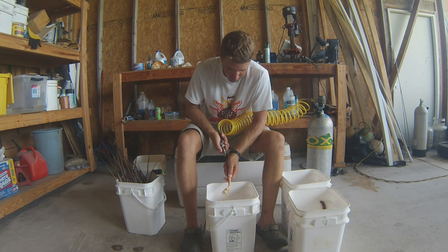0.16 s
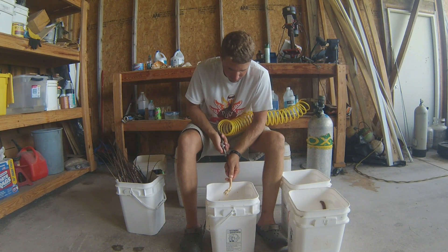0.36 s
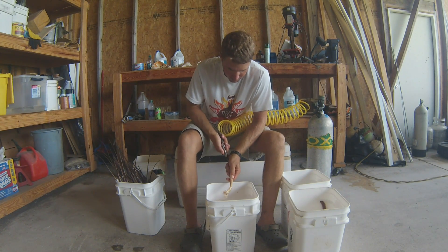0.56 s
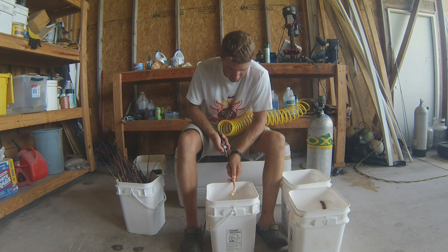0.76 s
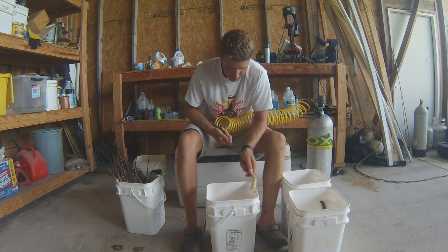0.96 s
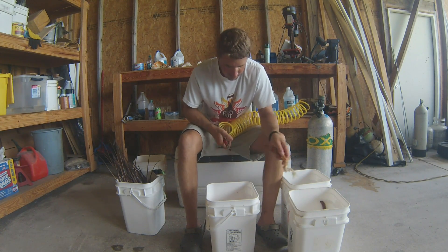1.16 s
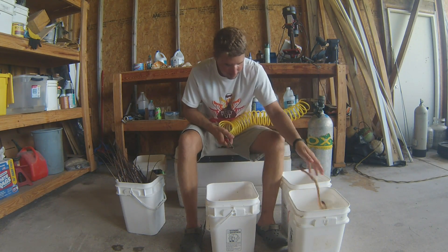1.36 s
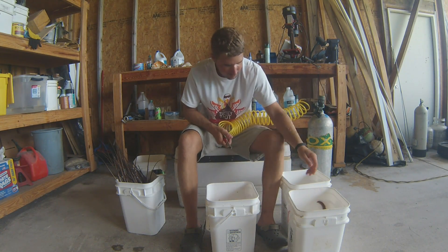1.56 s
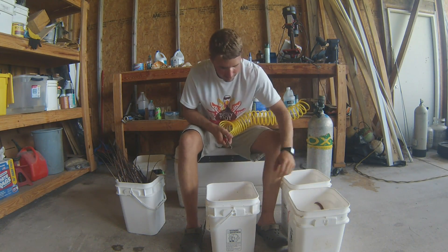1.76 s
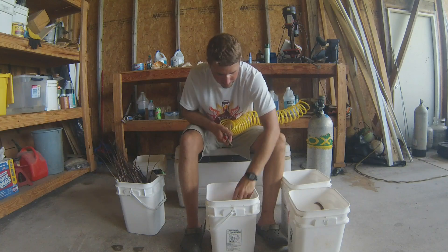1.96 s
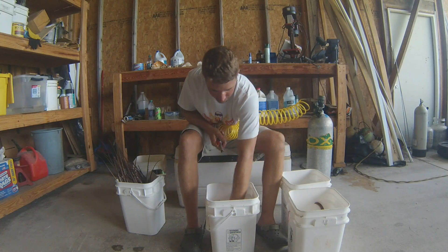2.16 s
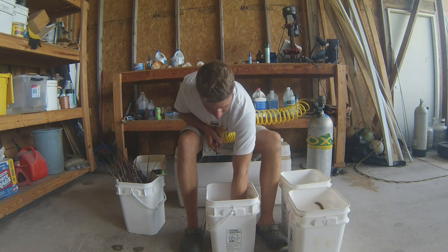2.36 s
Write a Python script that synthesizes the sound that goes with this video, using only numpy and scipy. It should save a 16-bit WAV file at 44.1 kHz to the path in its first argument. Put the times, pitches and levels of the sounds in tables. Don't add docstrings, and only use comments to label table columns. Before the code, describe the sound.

A brief hard burst of compressed air with a wet pop, then an empty shell clatters into a plastic bucket, hollow bumps follow, and a hand rummages among shells; echoing garage, small camera across the room.

```python
import sys
import numpy as np
from scipy import signal
from scipy.fft import rfft, irfft, next_fast_len
from scipy.io import wavfile
from scipy.ndimage import map_coordinates

SR = 44100
rng = np.random.default_rng(int(sys.argv[2]) if len(sys.argv) > 2 else 0)


def gain_from_db(level_db):
    decades = np.asarray(level_db, float) / 20
    return 10 ** decades


def put_to_file(sound):
    columns = np.atleast_2d(sound).T
    safe = np.clip(columns, -1, 1)
    whole_steps = np.round(safe * 32767)
    wavfile.write(sys.argv[1], SR, whole_steps.astype(np.int16))


N = 110250
T = np.arange(N) / SR


def unit(x):
    return x / np.sqrt(np.mean(x ** 2) + 1e-20)


def along(points, hz):
    point_hz, value = np.transpose(points)
    return np.interp(np.log(hz + 1), np.log(point_hz + 1), value)


def filtered(x, response):
    m = next_fast_len(len(x) + 8192)
    return irfft(rfft(x, m) * response(np.fft.rfftfreq(m, 1 / SR)), m)[:len(x)]


def noise(spectrum, size=N):
    return unit(filtered(rng.standard_normal(size), lambda hz: gain_from_db(along(spectrum, hz))))


def wobble(rate):
    return map_coordinates(rng.standard_normal(int(N * 500 / SR) + 4), [T * min(rate, 500)])


def ramp(start_s, length_s):
    return np.clip((T - start_s) / length_s, 0, 1)


def add(track, start_s, sound):
    part = track[round(start_s * SR):][:len(sound)]
    part += sound[:len(part)]


# pitch_hz, level_db (per Hz)
RUMBLE = [(12, -49.5), (20, -25.5), (60, 0.5), (73, -2), (87, -9.5), (162, -7), (193, -20.5), (225, -9.5),
          (420, -25), (550, -60), (920, -120)]
# pitch_hz, level_db (per Hz)
AIR = [(210, -18.5), (350, -11.5), (431, -6.5), (729, -11.5), (1160, -13), (1380, -17), (2260, -22.5),
       (8760, -26), (15800, -35.5)]


def background():
    whine = gain_from_db(-77 + 1.5 * wobble(90)) * np.sin(2 * np.pi * 13040 * T + 1.2 * wobble(120))
    hum = gain_from_db(-49 + 1.0 * wobble(14)) * np.sin(2 * np.pi * 56.5 * T + .8 * wobble(13))
    rumble = gain_from_db(-48 + 0.4 * wobble(5.14)) * noise(RUMBLE)
    air = gain_from_db(-58 + 0.85 * wobble(1.9)) * noise(AIR)
    return hum + rumble + air + whine


LEAK_S, LEAK_RISE_S, LEAK_DB, LEAK_SWELL_DB = 0.14, 0.027, -42.5, 8.5
POP_S, OPEN_S, SHUT_S, CLOSE_S = .2098, 0.0076, 0.39, 0.0069
JET_DB, SAG_DB, SAG_S = -26.5, 4, .08
SURGE_DB, SURGE_S, SURGE_RISE_S = -19, .009, .0065
GULP_DB, GULP_S, WHISTLE_DB = -22.5, 0.046, 3.5
# pitch_hz, level_db (per Hz)
LEAK = [(710, -24), (1200, -15), (1960, -21), (2090, -27), (5370, -10), (6110, -9.5), (12000, -14),
        (15500, -24)]
# pitch_hz, level_db (per Hz)
JET = [(180, -57), (300, -14), (985, -5.5), (1140, 4.5), (1730, -20), (2360, -16), (5130, 2), (5850, -2),
       (12000, -9), (15500, -20.5)]
# pitch_hz, width_hz, level_db
WHISTLE = [(1163, 134, -5.5), (2517, 1100, -5.5), (4070, 830, -2), (5590, 240, 2.5), (7470, 1300, -4)]
# pitch_hz, level_db
SURGE = [(300, -12), (700, -8), (1500, -14), (3000, 3.5), (4000, -8), (6000, 1.5), (8000, -12),
         (12000, -23)]
# pitch_hz, level_db (per Hz)
GULP = [(35, -24.5), (80, 0), (170, 7.5), (300, 2.5), (400, -21), (560, -14), (1150, 1.5), (1600, -6),
        (2500, -40)]
# start_s, level_db, pitch_hz
SNAPS = [
    (.2167, -1, 3700),
    (.2222, -9, 3900),
    (.2328, -14, 3700),
]


def tube(f):
    return sum((-1) ** k * gain_from_db(db) * 1j * f * width / (centre ** 2 - f * f + 1j * f * width)
               for k, (centre, width, db) in enumerate(WHISTLE))


def nozzle():
    def fall(decay_s):
        return np.exp(-np.maximum(T - POP_S - SURGE_RISE_S, 0) / decay_s)

    leak_db = LEAK_DB + LEAK_SWELL_DB * ramp(LEAK_S, POP_S - LEAK_S)
    leak = gain_from_db(leak_db) * ramp(LEAK_S, LEAK_RISE_S) * noise(LEAK)
    air = noise(JET) + gain_from_db(WHISTLE_DB) * unit(filtered(rng.standard_normal(N), tube))
    flow_db = JET_DB + SAG_DB * fall(SAG_S) + 1.4 * wobble(202.2) + 0.2 * wobble(37)
    flow = gain_from_db(flow_db) * ramp(POP_S, OPEN_S) * unit(air)
    surge_level = gain_from_db(SURGE_DB + 1.2 * wobble(401.5)) * ramp(POP_S, SURGE_RISE_S) * fall(SURGE_S)
    surge = surge_level * noise(SURGE)
    gulp = gain_from_db(GULP_DB) * ramp(POP_S, OPEN_S) * fall(GULP_S) * noise(GULP)
    out = (1 - ramp(SHUT_S, CLOSE_S)) * (leak + flow + surge + gulp)
    t = T[:SR // 50]
    for start_s, db, hz in SNAPS:
        add(out, start_s, -gain_from_db(db - 60 * t / .0035) * np.sin(2 * np.pi * hz * t))
    return out


CRACK_T60, WALL_NOISE_T60, WALL_NOISE_DB = .028, 0.064, 6.5
DROP_T60, BUMP_T60 = 0.22, .09
DROP_TWIN, BUMP_TWIN, TWIN_DB = 1.14, .89, -13
SLAP_DB, SLAP_S = -5, .00025
# start_s, crack_db, wall_db, drum_db, drum_hz
DROPS = [(.212, -50, -20, -18.5, 255.7), (1.145, -42, -34, -59, 270), (1.1685, -44, -32, -23, 275.4),
         (1.187, -18.5, -19, -19.5, 239.2), (1.194, -53, -24.5, -34, 251), (1.203, -49, -27, -33, 229),
         (1.226, -36, -36, -25.5, 235.7), (1.253, -44, -29.5, -30, 234.5), (1.321, -30.5, -27, -35, 244),
         (1.333, -49, -36, -41.5, 224), (1.596, -48, -50, -45, 391), (1.608, -50.5, -50, -39, 297)]
# start_s, crack_db, wall_db, drum_db, drum_hz
BUMPS = [(1.4224, -70, -27.5, -14, 274.3), (1.4305, -48, -39.5, -37, 264), (1.451, -58, -60, -32, 262),
         (1.627, -54, -55, -31.5, 270.5), (1.647, -61, -70, -36, 219), (1.68, -65, -55, -36.5, 260),
         (1.871, -54, -49, -25, 288), (1.89, -58, -40.5, -30, 295), (1.928, -51, -64, -35, 278),
         (1.947, -56.5, -40.5, -40, 285.5), (2.146, -35, -44.5, -39.5, 329), (2.17, -41, -40.5, -36, 295),
         (2.322, -67, -40, -29.5, 273), (2.337, -67, -49.5, -25.5, 274.6), (2.351, -52, -52, -29, 256),
         (2.361, -36.5, -34, -25, 267.6), (2.424, -32, -37.5, -34.5, 295), (2.464, -33, -40, -35.5, 300),
         (2.484, -29.5, -36.5, -39, 272)]
# pitch_hz, level_db, t60_s
WALL = [(355, -1, 0.05), (406, -4, 0.032), (542, -3.5, 0.063), (685, -8, 0.048), (729, -0.5, 0.036),
        (848, 0, 0.037), (913, -21.5, 0.24), (1010, -16, 0.2), (1152, 3, 0.054), (1334, -5.5, 0.045)]
# pitch_hz, level_db
SHELL = [(1300, -8), (2500, 9.5), (4100, 0.5), (6000, 1.5), (8000, 5.5), (11000, -15), (15500, -19)]
# pitch_hz, level_db
PILE = [(1300, -1), (2600, 0), (4200, 1), (5500, -5), (8000, -23), (12000, -28), (15500, -33)]


def bucket_wall(t):
    modes = 0
    for hz, db, t60 in WALL:
        level = gain_from_db(db + rng.normal(0, 4) - 60 * t / t60)
        modes = modes + level * np.sin(2 * np.pi * hz * rng.normal(1, .02) * t + rng.uniform(0, 6))
    spectrum = [(250, -5.5), (450, 3.5), (750, 5.5), (1300, 0.5), (1900, -29.5), (3000, -47)]
    diffuse = gain_from_db(WALL_NOISE_DB - 60 * t / WALL_NOISE_T60) * noise(spectrum, size=len(t))
    return 0.6 * modes + 0.5 * diffuse


def knocks(rows, colour, drum_t60, twin):
    out, t = np.zeros(N), T[:SR // 4]
    soft, sharp = 1 - np.exp(-t / .002), 1 - np.exp(-t / .001)
    for start_s, crack_db, wall_db, drum_db, hz in rows:
        crack = gain_from_db(crack_db - 60 * t / CRACK_T60) * np.minimum(t * 1000, 1) * noise(colour, size=len(t))
        wall = sharp * gain_from_db(wall_db) * bucket_wall(t)
        modes = np.sin(2 * np.pi * hz * t) + gain_from_db(TWIN_DB) * np.sin(2 * np.pi * hz * twin * t)
        drum = soft * gain_from_db(drum_db - 60 * t / drum_t60) * modes
        slap = gain_from_db(drum_db + SLAP_DB) * np.exp(-.5 * ((t - .6 / hz) / SLAP_S) ** 2)
        add(out, start_s, crack + wall - drum + slap)
    return out


# start_s, level_db, pitch_hz,
# t60_s
TICKS = [(.2335, -27, 3650, 0.022), (0.2424, -24, 4050, .015), (.26, -19, 2820, 0.025),
         (.609, -50, 5100, 0.022), (1.1453, -40, 9500, .006), (1.148, -39, 2400, 0.035),
         (1.1875, -24, 7780, 0.015), (1.203, -19, 7050, 0.013), (1.226, -48, 9300, 0.0093),
         (1.252, -46, 7740, 0.012), (1.298, -36, 7200, 0.0088), (1.32, -37.5, 9080, 0.011),
         (1.332, -45, 13000, .012), (1.338, -37, 6800, 0.013), (1.384, -45, 7000, 0.014),
         (1.596, -48, 1460, 0.034), (1.95, -50.5, 2550, 0.02), (2.08, -44.5, 850, .04),
         (2.128, -53, 3000, .01), (2.141, -42, 2570, .015), (2.148, -30.5, 4160, 0.012),
         (2.167, -42.5, 2850, 0.035), (2.17, -59, 11500, 0.024), (2.18, -32, 1358, .04),
         (2.218, -56, 11000, 0.0093), (2.222, -40.5, 3460, 0.023), (2.2684, -41, 2610, 0.046),
         (2.272, -56, 12000, .02), (2.282, -41, 4030, 0.016), (2.297, -43, 6340, 0.011),
         (2.313, -46, 2400, 0.019), (2.342, -42, 2400, .04), (2.406, -42, 2440, .02),
         (2.424, -35.5, 3040, .03), (2.454, -53, 11500, .03), (2.4655, -26, 1400, 0.022),
         (2.485, -49.5, 11500, 0.043), (2.485, -39, 8100, 0.022), (2.4985, -39, 3500, .02)]


def ticks():
    out, t = np.zeros(N), T[:SR // 16]
    for start_s, db, hz, t60 in TICKS:
        draw = rng.uniform(-1, 1, (24, 2))
        mode_hz = hz * (1 + .17 * draw[:, :1])
        ring = np.sin(2 * np.pi * mode_hz * t + 2.5 * draw[:, 1:]).sum(axis=0) / 4
        add(out, start_s, gain_from_db(db - 60 * t / t60) * np.minimum(t * 900, 1) * ring)
    return out


GRAINS_PER_S, GRAIN_DB, WASH_DB = 2800, 4, -1
GRAIN_HZ, GRAIN_SPREAD, GRAIN_CYCLES = 2300, 2.9, 3
# start_s, level_db
RATTLE = [
    (1.144, -44),
    (1.15, -42),
    (1.19, -38),
    (1.29, -40.5),
    (1.31, -49),
    (1.34, -48),
    (1.42, -62),
]
# pitch_hz, level_db (per Hz)
SPRAY = [(240, -36), (450, -28), (700, 6), (1300, 10.5), (2200, -5.5), (4000, -4), (7000, -37),
         (12000, -42), (15600, -50)]
# start_s, level_db
RUMMAGE = [
    (2.122, -53),
    (2.14, -38.5),
    (2.19, -42.5),
    (2.25, -43.5),
    (2.3, -42),
    (2.4, -43),
    (2.45, -43),
    (2.5, -52),
]
# pitch_hz, level_db (per Hz)
SCRAPE = [(240, -31), (450, -2.5), (590, -18), (730, 0.5), (1400, -3), (1800, -9), (2600, -13.5),
          (4010, -17), (8000, -21.5), (12000, -41), (15600, -60)]


def scrape(rows, spectrum):
    s, db = np.transpose(rows)
    draw, t = rng.random((1500, 3)), np.arange(256)
    gaps_s = -np.log(draw[:, 0]) / GRAINS_PER_S
    start = (SR * (s[0] + np.cumsum(gaps_s))).astype(int)[:, None]
    hz = np.clip(GRAIN_HZ * np.exp(GRAIN_SPREAD * (draw[:, 1:2] - .5)), 300, 14000)
    level = gain_from_db(-GRAIN_DB * np.log(draw[:, 2:] + 0.099)) * np.sqrt(hz)
    decay = np.exp(-t / SR * hz / GRAIN_CYCLES * 2)
    rings = level * decay * np.sin(2 * np.pi * hz * t / SR)
    hits = np.bincount((start + t).ravel(), rings.ravel(), minlength=N)[:N]
    active = (T > s[0]) & (T < s[-1])
    wash = gain_from_db(WASH_DB + 5.0 * wobble(50)) * rng.standard_normal(N)
    grains = hits / np.std(hits[active]) + wash
    grains = filtered(grains, lambda f: gain_from_db(along(spectrum, f)))
    return gain_from_db(np.interp(T, s, db)) * active * grains / np.std(grains[active])


ROOM_DB, ROOM_DELAY_S = -3.5, .006
# pitch_hz, t60_s
GARAGE = [(150, 0.48), (1000, 0.59), (4000, 0.43), (8000, 0.41), (14000, 0.38)]
# start_s, level_db
WALLS = [(.0055, -12), (0.0176, -19.5), (0.028, -16), (0.042, -17)]
# pitch_hz, level_db
ROOM_TONE = [(150, -8.5), (280, -7.5), (400, -1.5), (600, -1.5), (1000, -4.5), (3000, -2.5), (10000, -0.5)]


def garage(x):
    hz, t, z = signal.stft(rng.standard_normal(SR), SR, nperseg=256)
    tail = signal.istft(z * gain_from_db(-60 * t / along(GARAGE, hz)[:, None]), SR, nperseg=256)[1]
    reply = np.zeros(SR)
    for start_s, db in WALLS:
        reply[round(start_s * SR)] = gain_from_db(db)
    add(reply, ROOM_DELAY_S, gain_from_db(ROOM_DB) * tail / np.linalg.norm(tail))
    return x + filtered(signal.fftconvolve(x, reply)[:N], lambda f: gain_from_db(along(ROOM_TONE, f)))


# pitch_hz, width_hz, level_db
HOUSING = [(1140, 940, 2), (1670, 1570, -5), (2560, 600, 5.5), (4180, 730, 5), (5390, 360, -5.5),
           (5900, 600, 2), (6800, 700, -3), (9200, 610, -5)]


def housing(x):
    def response(f):
        shape_db = sum(db * np.exp(-.5 * ((f - c) / w * 2) ** 2) for c, w, db in HOUSING)
        cepstrum = irfft(np.log(gain_from_db(shape_db)))
        cepstrum[1:len(cepstrum) // 2] *= 2
        cepstrum[len(cepstrum) // 2 + 1:] = 0
        return np.exp(rfft(cepstrum))[:len(f)]
    return filtered(x, response)


def scene():
    drops = knocks(DROPS, SHELL, DROP_T60, DROP_TWIN)
    bumps = knocks(BUMPS, PILE, BUMP_T60, BUMP_TWIN)
    slides = scrape(RATTLE, SPRAY) + scrape(RUMMAGE, SCRAPE)
    near = nozzle() + drops + bumps + ticks() + slides
    return (housing(garage(near)) + background())[None]


def low_pass(x):
    return signal.sosfilt(signal.butter(12, 16180, fs=SR, output="sos"), x)


def record(dry):
    mix = filtered(dry[0], lambda hz: gain_from_db(-30 * np.clip((hz - 15350) / 300, 0, 4)))[None]
    return low_pass(mix)


dry = scene()
out = record(dry)
put_to_file(out)
```